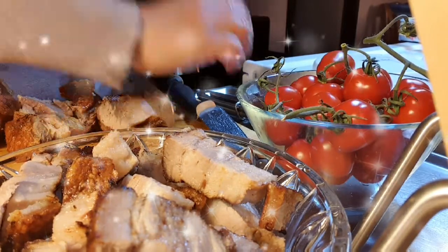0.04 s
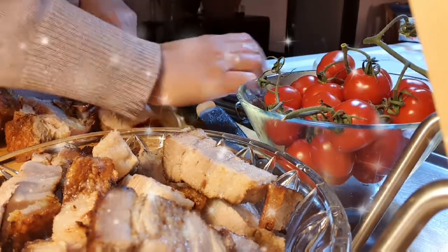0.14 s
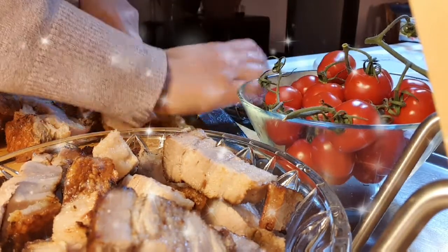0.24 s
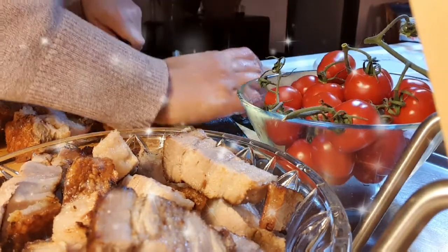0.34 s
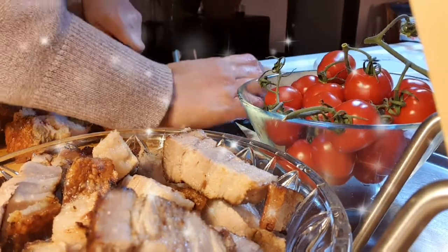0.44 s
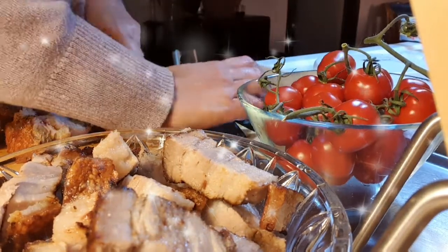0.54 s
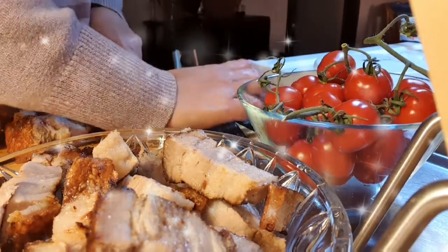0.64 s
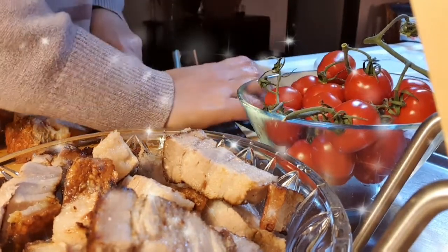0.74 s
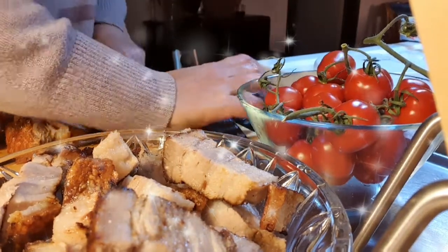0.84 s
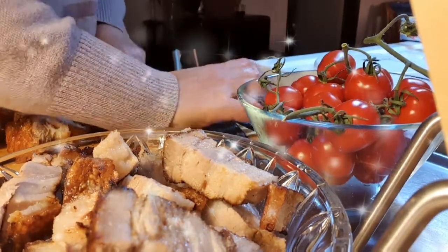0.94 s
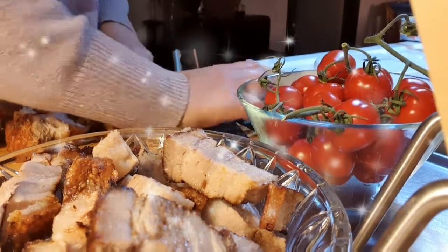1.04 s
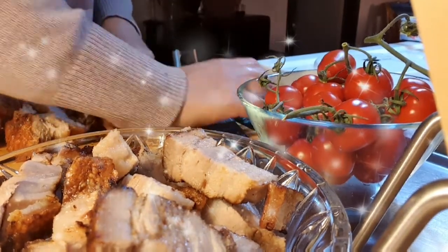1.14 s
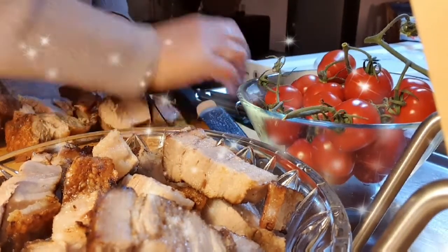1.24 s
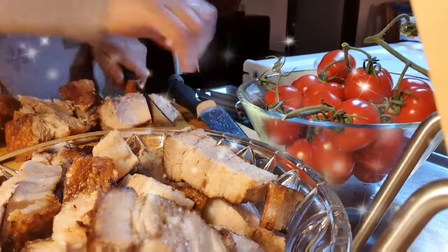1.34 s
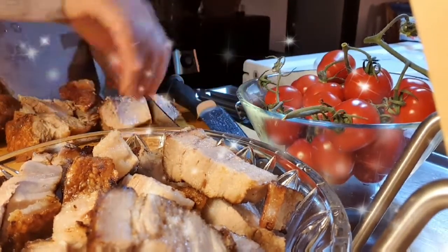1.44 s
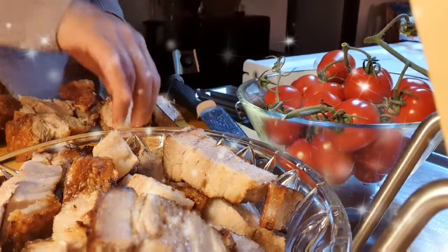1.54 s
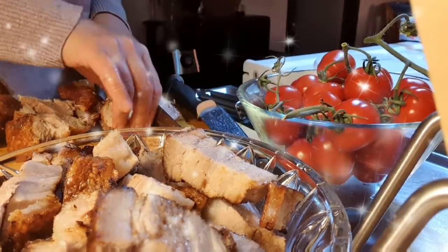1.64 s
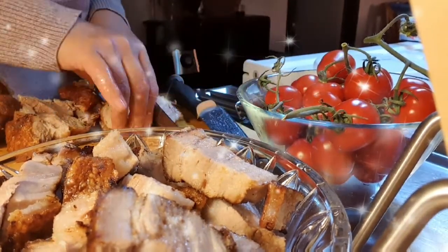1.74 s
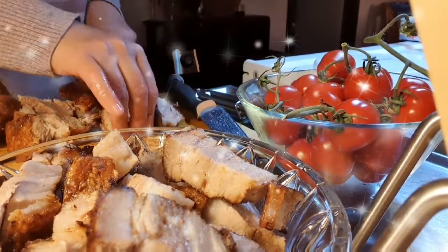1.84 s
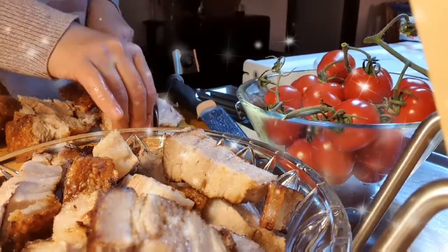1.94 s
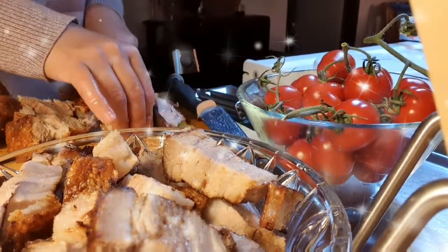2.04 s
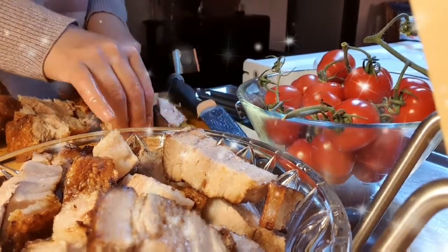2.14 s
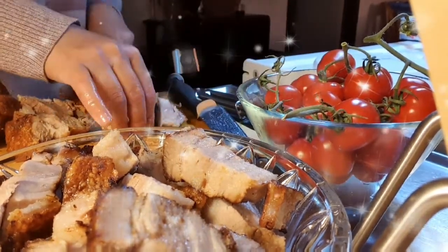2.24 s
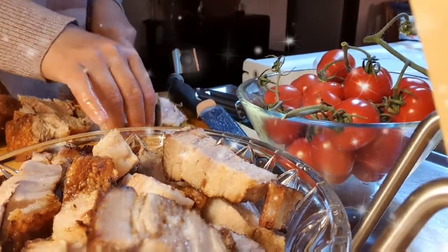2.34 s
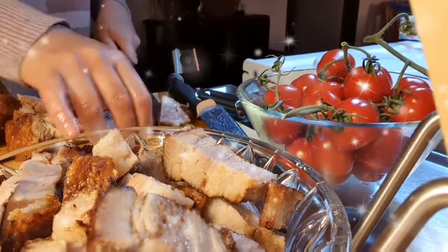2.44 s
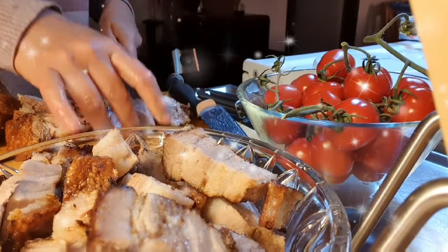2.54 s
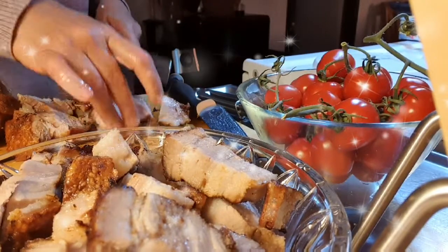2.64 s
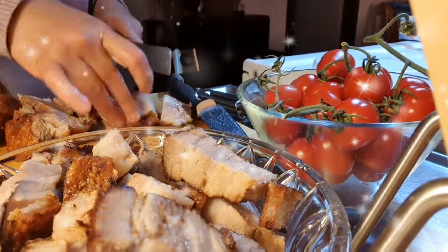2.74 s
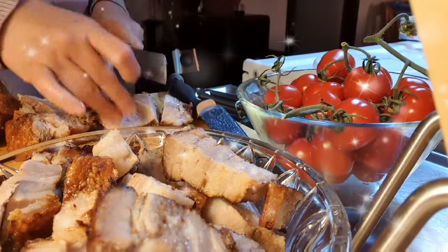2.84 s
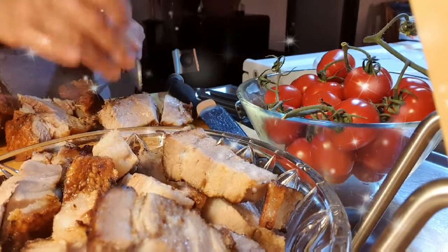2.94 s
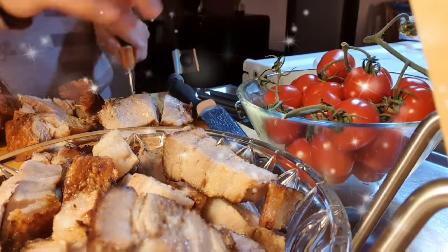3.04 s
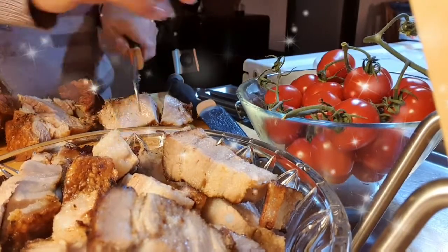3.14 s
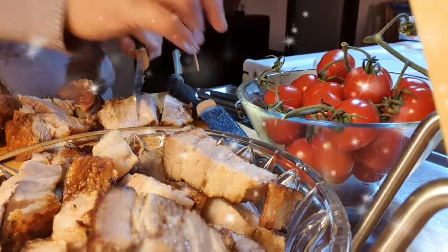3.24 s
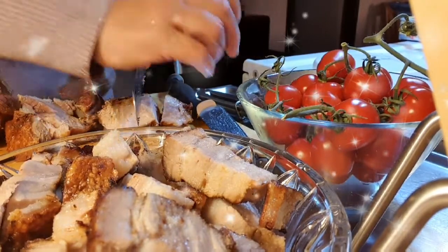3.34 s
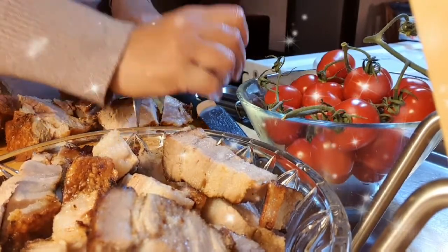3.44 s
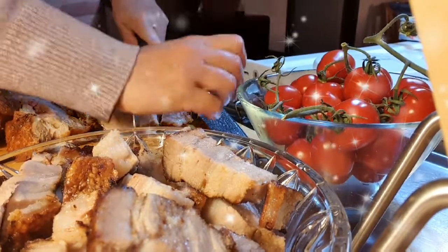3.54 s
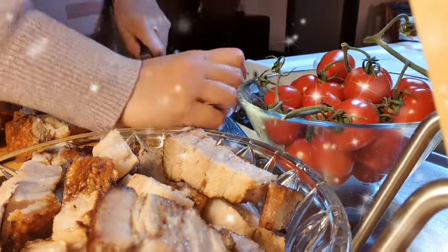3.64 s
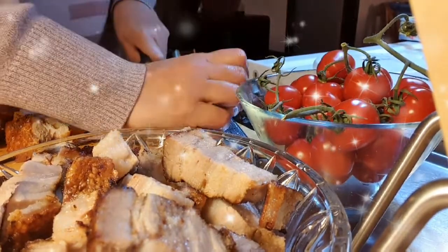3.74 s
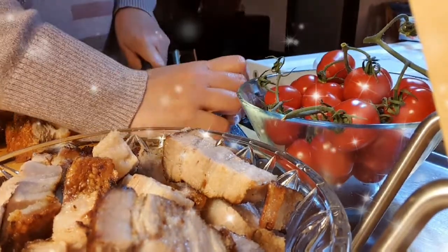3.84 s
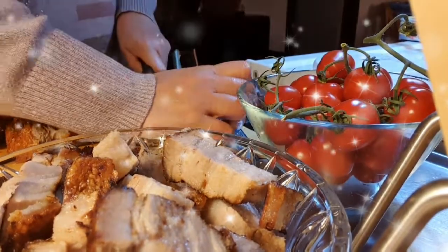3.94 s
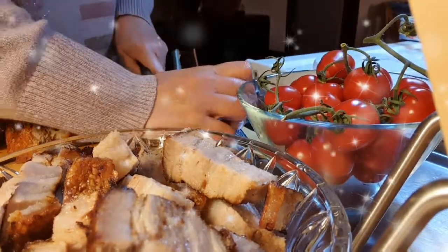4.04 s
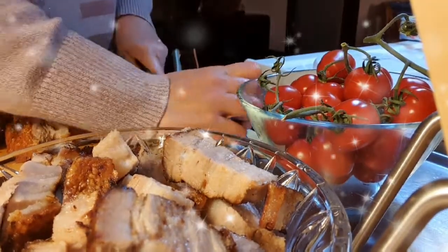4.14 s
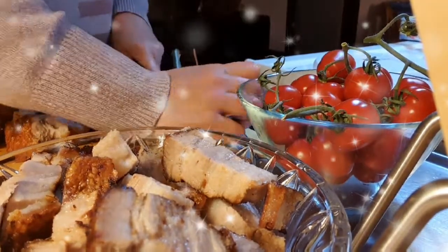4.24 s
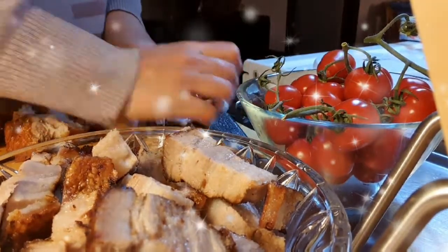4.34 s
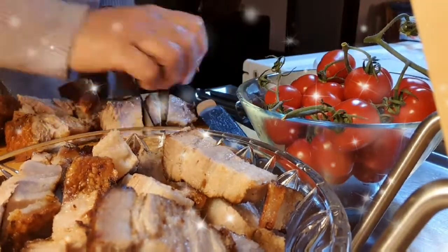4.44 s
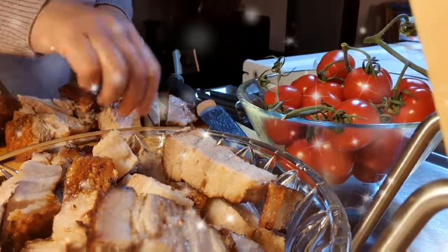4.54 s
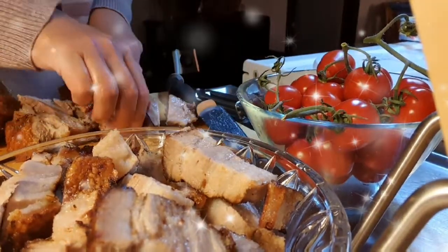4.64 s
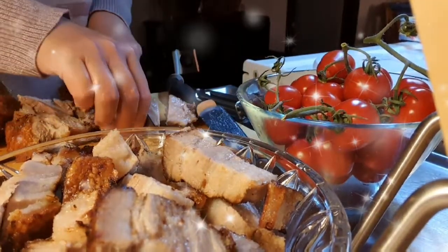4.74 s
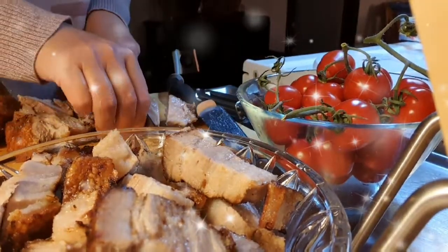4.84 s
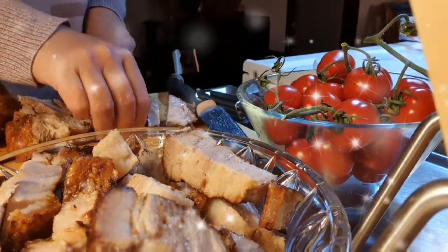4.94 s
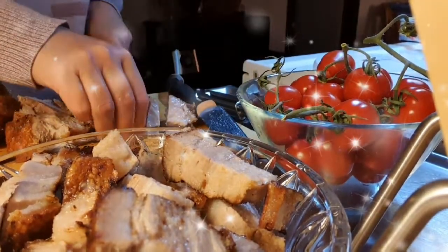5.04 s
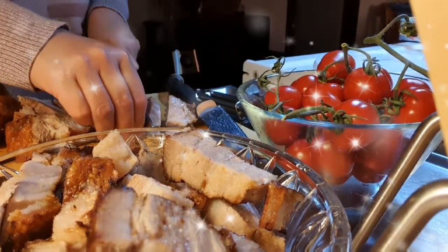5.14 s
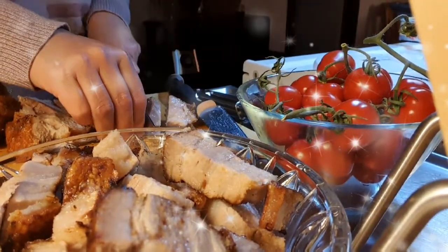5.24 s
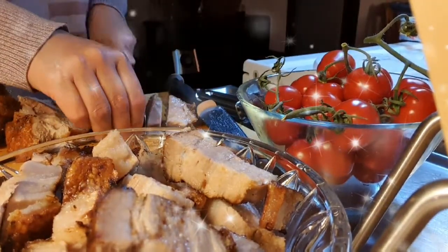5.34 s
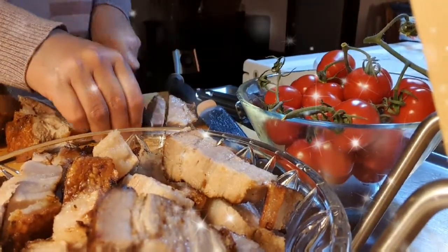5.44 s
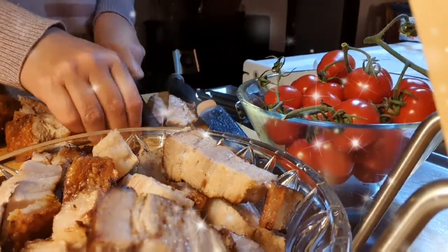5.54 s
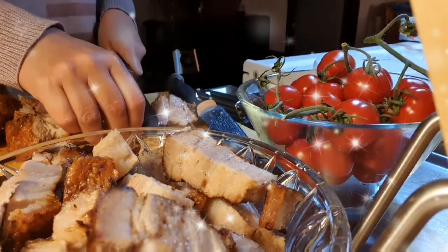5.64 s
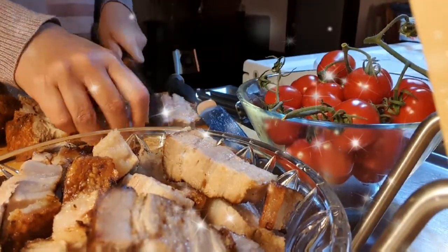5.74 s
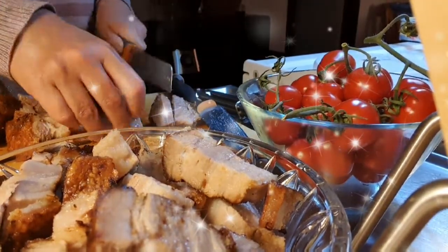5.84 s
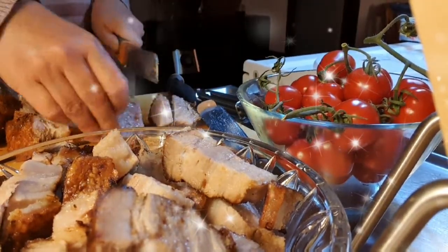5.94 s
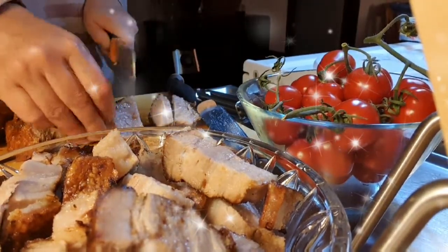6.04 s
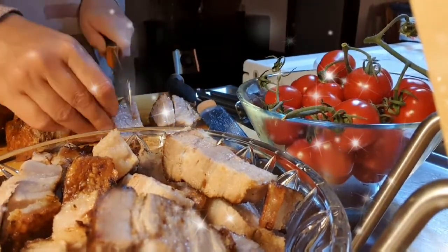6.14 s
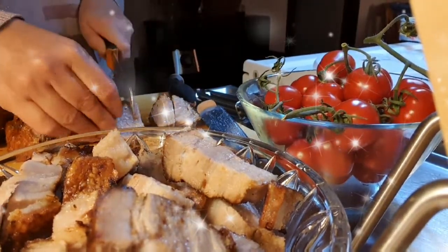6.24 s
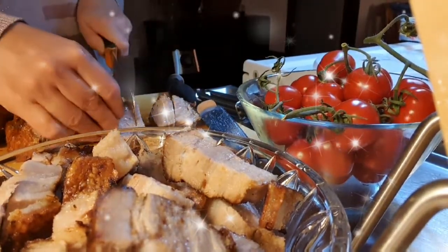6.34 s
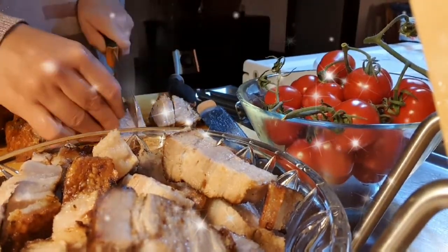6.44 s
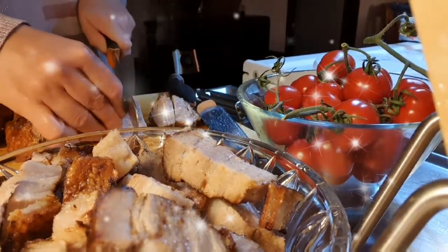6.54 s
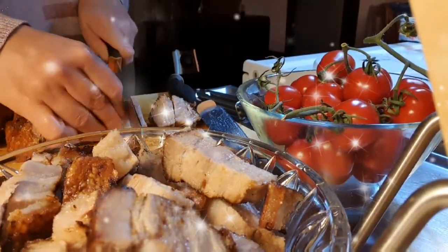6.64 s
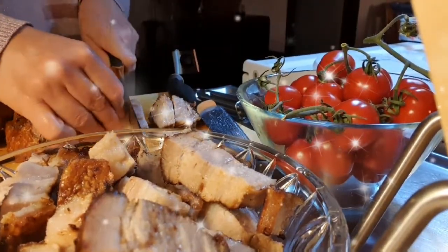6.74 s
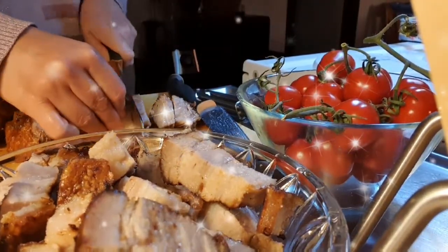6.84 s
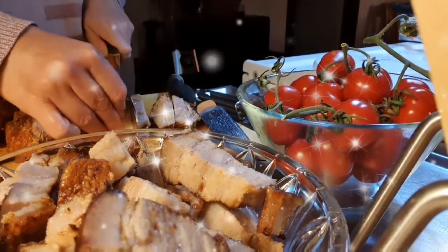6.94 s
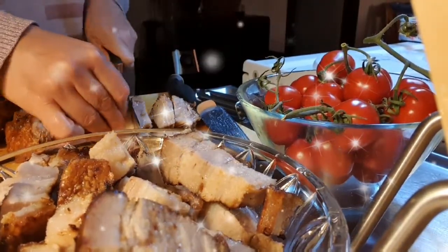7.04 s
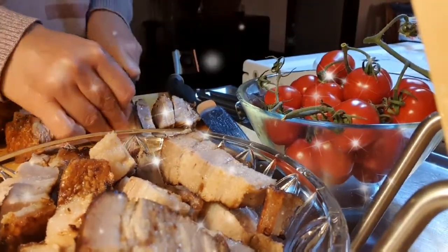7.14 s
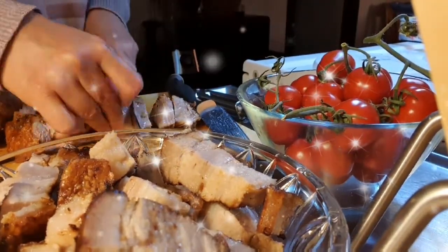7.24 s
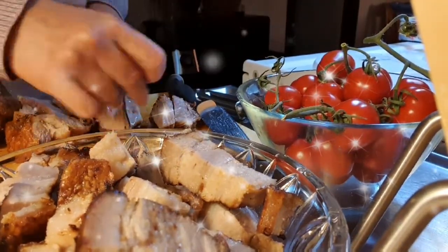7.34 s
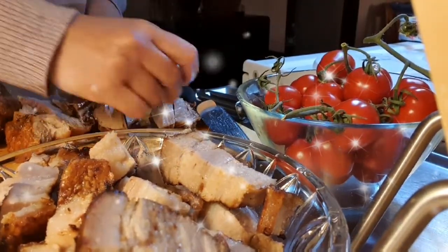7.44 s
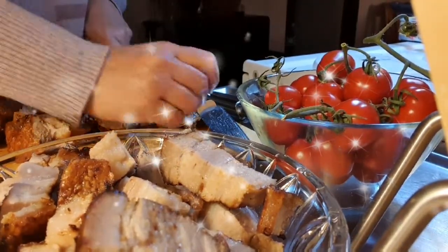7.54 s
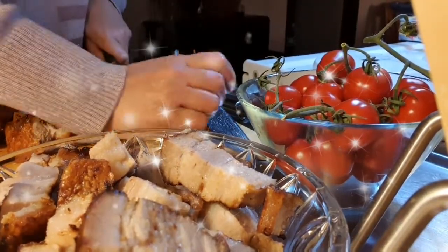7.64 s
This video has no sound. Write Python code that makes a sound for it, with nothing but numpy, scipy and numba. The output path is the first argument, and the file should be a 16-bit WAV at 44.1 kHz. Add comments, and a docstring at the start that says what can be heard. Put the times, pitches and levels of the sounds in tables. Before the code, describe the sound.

Dry, brittle snaps of pork crackling come in separate bunches as a knife cuts, each with dull low bumps of board and counter. Between cuts there is almost nothing but tiny rustles from the hands and faint room air. The strongest cracks fall near one, four and five and a half seconds; a single metallic blade clink comes late. Close microphone, short room tail.

```python
"""A knife saws and presses through crisp pork skin on a wooden board that stands on a kitchen counter.
The crust is random clicks in three crumb sizes, coloured and resonated, with single cracks as bursts.
Filtered clicks shake the damped modes of board and counter; the clink sums decaying, beating blade modes.
A small quiet kitchen adds a short tail of decaying noise to crust and clink, over faint steady air noise."""
import sys
import numpy as np
from scipy import signal
from scipy.fft import rfft, irfft
from scipy.io import wavfile
from scipy.ndimage import uniform_filter1d
from numba import njit

SR = 44100
rng = np.random.default_rng(int(sys.argv[2]) if len(sys.argv) > 2 else 0)


def waveform_to_disk(signal):
    """Save audio, clipped to [-1, 1], as 16-bit WAV at the path in sys.argv[1]."""
    frames = np.transpose(np.atleast_2d(signal))
    scaled = np.clip(frames, -1, 1) * 32767
    samples = np.round(scaled).astype(np.int16)
    wavfile.write(sys.argv[1], SR, samples)


N = 338247
T = np.arange(N) / SR  # time in seconds

# Strokes of the blade and shoves of the meat. Each row: full force from in seconds, climb in seconds,
# hold in seconds, relative crumb level in dB, coarse crumbs over it in dB, fine crumbs over it in dB,
# relative board shake in dB.
BLADE_STROKES = [(0.0, .03, .02, -95, 0, -2, -56), (0.224, .03, .03, -69, 3, -18, -41),
                 (0.31, .04, .04, -70, 0, -4, -45), (0.394, .03, .13, -67, 7, -5, -44),
                 (0.58, .03, .04, -63, -2, -11, -46), (0.655, .03, .04, -59, 4, -4, -44),
                 (0.735, .04, .0, -42, -6, -3, -44), (0.886, .025, .025, -35, -4, -3, -33),
                 (0.94, .04, .025, -43, 2, -9, -31), (1.135, .1, .01, -65, -7, -9, -58),
                 (1.237, .05, .03, -77, 6, -9, -52), (1.33, .05, .1, -82, 6, -12, -62),
                 (1.74, .03, .04, -86, -3, 1, -66), (1.875, .07, .07, -48, -3, -9, -34),
                 (1.96, .04, .02, -54, -7, -6, -28), (2.09, .05, .01, -49, 2, -4, -31),
                 (2.152, .1, .02, -37, 0, -4, -23), (2.27, .1, .03, -42, 0, -8, -28),
                 (2.35, .06, .02, -40, -1, -9, -35), (2.47, .1, .02, -57, 9, -14, -44),
                 (2.63, .03, .04, -66, 5, -20, -39), (2.8, .04, .03, -61, 7, -13, -49),
                 (2.958, .02, .005, -62, -15, -15, -52), (3.35, .15, .02, -110, 0, -10, -69),
                 (3.66, .06, .02, -84, -16, 8, -65), (3.735, .02, .02, -61, -1, -2, -55),
                 (3.86, .12, .02, -65, 0, -5, -53), (3.96, .12, .05, -47, 0, -4, -44),
                 (4.05, .1, .055, -45, 0, -8, -35), (4.2, .06, .02, -70, -1, 0, -44),
                 (4.398, .03, .01, -79, 4, -9, -60), (4.52, .06, .03, -85, -1, 2, -73),
                 (4.704, .025, .07, -70, -4, -9, -55), (4.86, .05, .02, -88, 3, 6, -72),
                 (4.92, .03, .02, -64, 2, -4, -54), (5.0, .07, .075, -42, 2, -7, -23),
                 (5.11, .04, .02, -66, -3, 0, -30), (5.195, .04, .03, -48, 1, -8, -27),
                 (5.26, .05, .015, -44, 4, -5, -23), (5.411, .1, .005, -37, 3, -4, -22),
                 (5.53, .1, .03, -55, 5, -15, -43), (5.595, .05, .01, -51, 3, -11, -27),
                 (5.685, .05, .005, -39, -5, -11, -39), (5.98, .02, .0, -80, 12, -22, -68),
                 (6.11, .1, .02, -110, 0, -10, -63), (6.33, .04, .03, -90, 0, -6, -80),
                 (6.5, .04, .04, -92, 2, -6, -78), (6.66, .04, .04, -92, 0, -2, -74),
                 (6.74, .02, .04, -77, -16, -6, -82), (6.8, .02, .01, -85, -6, -3, -37),
                 (6.98, .08, .12, -92, -10, 6, -70), (7.175, .05, .04, -53, -3, -9, -44),
                 (7.383, .06, .02, -59, 7, -22, -44), (7.45, .08, .03, -63, -3, -9, -48)]
# Hands resting and shifting between strokes. Each row: time in seconds, relative board shake in dB.
HAND_SHIFTS = [(0.0, -66), (0.17, -82), (0.3, -58), (1.1, -59), (1.3, -57), (1.75, -70), (2.5, -60),
               (2.97, -58), (3.04, -81), (3.57, -85), (3.75, -64), (4.25, -68), (4.88, -78), (5.75, -50),
               (5.95, -68), (6.24, -85), (6.4, -76), (6.75, -80), (6.87, -54), (7.07, -60), (7.14, -71),
               (7.52, -52), (7.67, -90)]
# Crumb level over the hands' board shake in dB: coarse, middle, fine.
HANDS_CRUMBS_OVER_DB = [-26, -33, -34]
# Single snaps and small taps. Each row: start in seconds, relative peak in dB, coarse part over it in dB,
# fine part over it in dB, relative knock on the board in dB.
SNAPS = [(0.2024, -64, 6, -8, -60), (0.2197, -50, 3.5, -12, -62), (0.2833, -45.5, 0.5, -9, -52),
         (0.3022, -49.5, 7.5, -20, -30.5), (0.375, -47, 5, -12, -47), (0.4088, -46, -2, -11, -46),
         (0.4418, -56.5, 9, -17, -51), (0.4807, -42, 0, -23, -49), (0.5723, -40, -11, -4, -59),
         (0.6412, -22.5, -7, -6, -35), (0.7154, -31, -10.5, -7, -44), (0.7218, -30, -3.5, -3.5, -43),
         (0.74, -27.5, -8.5, -10, -60), (0.8807, -23, -2.5, -9.5, -31), (0.8968, -16.5, -7.5, -14, -33),
         (0.9289, -23, -8, -14.5, -18.5), (0.9722, -14.5, -8, -7.5, -34), (1.0824, -55, -10, 6, -62),
         (1.131, -51.5, -3, -13, -61), (1.1444, -55, 0, 3, -52), (1.2214, -59, 11.5, -17, -52),
         (1.3022, -69, -0.5, -32, -65), (1.3808, -60, 6, -21, -75), (1.4545, -65, 3, -20.5, -78),
         (1.5212, -72, 9, -18, -69), (1.8554, -46, -8, -3, -38), (1.8838, -40, -14.5, -7.5, -37),
         (1.9905, -38, 5.5, 3, -40.5), (2.0315, -24.5, -5, -5, -62), (2.0646, -25.5, -12.5, -17, -47),
         (2.0842, -30, -14.5, -7, -44), (2.154, -27, 0, -3.5, -27.5), (2.2142, -40, 6, -7, -35),
         (2.4413, -45, -3, 1, -49), (2.6127, -51.5, 14.5, -29, -51), (2.6312, -56, 2, -30, -61),
         (2.7754, -51, 2, -18, -58), (2.9482, -42.5, -12, -21, -61), (3.6174, -68, -12, -4, -75),
         (3.6564, -62, -18, -5, -73), (3.7252, -36, -9, -5.5, -48), (3.7886, -45.5, -3.5, -10.5, -50.5),
         (3.83, -45.5, -6, -8, -50.5), (3.879, -44, -7.5, -7.5, -50), (3.9078, -41, 0, -15, -47),
         (3.9647, -26.5, 3, -2, -39.5), (3.9994, -16, -4.5, -11, -39.5), (4.0369, -11, -4.5, -7, -27.5),
         (4.0901, -11.5, -10.5, -6.5, -31.5), (4.0956, -21.5, -13, -8, -36), (4.2408, -31.5, -14, -7, -50),
         (4.2796, -51, -11, -13, -62), (4.3824, -63, 2, -12, -65), (4.6956, -47.5, -16, -2.5, -71),
         (4.7383, -34.5, -6, -11.5, -60), (4.9093, -36, -10.5, 1, -60), (4.9671, -37, -2.5, -10, -38.5),
         (5.1706, -42, -4, -4.5, -51), (5.3522, -35.5, 1.5, 0, -53), (5.4096, -12, -1.5, -6.5, -23),
         (5.5856, -36, -3.5, -28, -37), (5.6645, -30, -7, -14, -46), (5.687, -32, -10, -9, -48),
         (5.957, -65, 7.5, -9, -75), (5.9848, -64, 4, -20, -69), (7.1918, -35, -12, -6, -50),
         (7.3125, -53.5, -4, -16, -66), (7.3422, -42, -7, -12, -64), (7.3778, -43, -2, -15, -45),
         (7.459, -50, 6, 1, -61)]
# Decay times of a snap by 60 dB in seconds: coarse, middle, fine.
SNAP_DECAYS_S = [0.052, 0.035, 0.043]
# Colour of coarse, middle and fine crumbs, a curve each. Each row: frequency in Hz, relative level in dB.
CRUMB_COLOURS = [
    [(400, -21.5), (700, -3), (1200, -2), (1700, -2.5), (3200, -26)],
    [(1100, -24), (2100, -1.5), (3400, -4), (4800, -5.5), (7000, -26)],
    [(4000, -26), (5800, 1.5), (7600, -4.5), (8800, -0.5), (14300, -7.5), (16000, -12)],
]
# Pitches at which coarse, middle and fine crumbs ring. Each row: lowest in Hz, highest in Hz.
CRUMB_PITCHES = [(700, 1900), (1900, 5650), (5300, 13000)]
# Rings under the crust. Each row: frequency in Hz, width in Hz, relative spectral peak in dB.
CRUST_MODES = [(875, 130, -4), (1307, 13, 10.5), (1676, 46, 7.5), (2140, 55, 1), (5180, 170, -13)]
# Modes of the wooden board. Each row: frequency in Hz, width in Hz, relative spectral peak in dB.
BOARD_MODES = [(211, 56, -5.5), (256.4, 13, 3), (287.1, 28, 6), (347, 34, -6.5), (468.5, 31, -7.5),
               (510, 13, -15.5)]
# Modes of the counter. Each row: frequency in Hz, width in Hz, relative spectral peak in dB.
COUNTER_MODES = [(60, 25, -8), (95.5, 19, -1.5), (113.3, 22, 1)]
# Thumps of the board against the counter. Each row: time in seconds, relative level in dB.
BOARD_THUMPS = [(0.02, -50), (0.23, -33), (0.44, -41), (0.575, -38), (0.73, -31), (0.93, -17), (1.27, -45),
                (1.92, -28), (1.98, -32), (2.09, -29), (2.18, -23), (2.64, -42), (2.75, -48), (3.3, -72),
                (3.66, -51), (3.82, -50), (4.01, -26), (4.07, -37), (4.2, -46), (4.4, -53), (4.99, -25),
                (5.08, -31), (5.18, -30), (5.34, -31), (5.44, -27), (5.6, -29), (5.7, -35), (6.11, -53),
                (6.33, -62), (6.5, -66), (6.72, -63), (6.8, -43), (7.02, -49), (7.2, -43), (7.5, -56)]
# Colour of the kitchen air. Each row: frequency in Hz, relative level in dB.
AIR_COLOUR = [(15, -27.5), (25, 2), (105, 4), (229, -9), (285, -3.5), (607, -26.5), (1610, -27),
              (7310, -40.5), (8590, -41), (16000, -44.5)]
# Modes of the blade. Each row: frequency in Hz, relative level in dB, decay by 60 dB in seconds.
BLADE_MODES = [(1233, -13, .15), (1416, -12, .15), (2095, -8, .12), (2240, -9, .1), (2750, -6, .12),
               (2942, -8, .12), (3275, -7, .1), (4245, -2, .12), (4404, -9, .1), (5757, 0, .13),
               (6910, -5, .08), (7617, -15, .1), (8349, -12, .1), (8990, -4, .08), (9225, -7, .09),
               (9964, -13, .09), (11270, -6, .08), (11440, -9, .08), (13460, -17, .1), (15440, -30, .07)]

CLIMB_DB = 30  # rise of a swell within its climb time
CRUST_FALL_DB_S, BOARD_FALL_DB_S, COUNTER_FALL_DB_S = 480, 320, 400  # dB per second
LINGER_DB, LINGER_FALL_DB_S = -27, 150  # the meat settles after each stroke
GRAIN_FLOOR_DB = -102  # a constant, very faint hiss of grains beneath everything
STROKE_COUNTER_DB, HANDS_COUNTER_DB = -12, 5  # counter shake over board shake
THUMP_CLIMB_S, THUMP_HOLD_S = .04, .005
AIR_DB = -74  # rms
ROOM_T60_S, ROOM_TREBLE_T60_S, ROOM_DB = .38, .24, -14
CLINK_S, CLINK_DB = 6.7895, -24
TOP_HZ = 15800


def undb(db):
    """Amplitude ratio, by the definition of the decibel."""
    return 10 ** (np.asarray(db) / 20)


def level(x, db):
    """Linear scaling to a given rms level."""
    return x * undb(db) / np.sqrt(np.mean(x ** 2))


def unit(h):
    """Normalisation of a response to unit energy."""
    return h / np.sqrt(np.sum(h ** 2))


def through(x, h):
    """A linear system: its output is input convolved with impulse response."""
    return signal.fftconvolve(x, h)[:N]


def curves(table):
    """Linear interpolation of a table's columns, one value a sample."""
    s, *columns = np.transpose(table)
    return [np.interp(T, s, c) for c in columns]


def response(points, size=2048):
    """Minimum phase: folding the cepstrum makes a colour causal; unit energy."""
    hz, db = np.transpose(points)
    grid = np.maximum(np.arange(size // 2 + 1), 1) * SR / size
    colour_db = np.interp(np.log(grid), np.log(hz), db, left=-70, right=-70)
    ceps = irfft(np.log(undb(colour_db)))
    ceps[1:size // 2] *= 2
    ceps[size // 2 + 1:] = 0
    return unit(irfft(np.exp(rfft(ceps))))


def ring(modes):
    """Modal superposition: damped sines, each decaying as its width demands."""
    t = T[:SR // 4]
    out = 0
    for hz, width_hz, db in modes:
        decay = np.exp(-np.pi * width_hz * t)
        # proportional to width, so that the dB set the spectral peak
        out = out + undb(db) * 2 * np.pi * width_hz / SR * decay * np.sin(2 * np.pi * hz * t)
    return out


def grains(per_s, spread_db):
    """Shot noise: random clicks of either sign, sizes spread exponentially in dB; rms 1."""
    hit = rng.random(N) < per_s / SR
    size = undb(spread_db * rng.exponential(size=N))
    return level(hit * rng.standard_normal(N) * size, 0)


def bursts(times, db, t60):
    """Exponential decay: envelope of sudden bursts that die away."""
    out = np.zeros(N)
    out[(np.asarray(times) * SR).astype(int)] = undb(db)
    return through(out, 1000. ** (-T[:SR // 4] / max(t60, .001)))


def swells(s, climb, hold, top_db, fall_db_s):
    """Exponential growth and decay: gain of events that climb, hold and fall."""
    t = T[::64, None]
    climbing = CLIMB_DB * (s - t) / np.maximum(climb, .005)
    falling = fall_db_s * (t - s - hold)
    under_db = np.maximum(np.maximum(climbing, falling), 0)
    return np.interp(T, t.ravel(), undb(top_db - under_db).sum(axis=1))


def force(stroke_db, hands_db, fall_db_s):
    """Superposed forces: the strokes, the settling after each, and the hands beneath them."""
    s, climb, hold, *_ = np.transpose(BLADE_STROKES)
    strokes = swells(s, climb, hold, stroke_db, fall_db_s)
    linger = swells(s, climb, hold, stroke_db + LINGER_DB, LINGER_FALL_DB_S)
    return strokes + linger + undb(curves(HAND_SHIFTS)[0] + hands_db)


@njit
def resonate(x, hz, sharp):
    """Resonance: a state-variable band-pass with a moving centre, gain 1 there."""
    y, band, low = np.empty(len(x)), 0., 0.
    for i in range(len(x)):
        g = np.tan(np.pi * hz[i] / SR)
        v = (band + g * (x[i] - low)) / (1 + g * (g + 1 / sharp))
        band, low, y[i] = 2 * v - band, low + 2 * g * v, v / sharp
    return y


def crust():
    """Brittle fracture: grains of three sizes, steady under the blade and bunched in snaps."""
    s, peak_db, coarse_db, fine_db, _ = np.transpose(SNAPS)
    *_, crumbs_db, coarser_db, finer_db, _ = np.transpose(BLADE_STROKES)
    # crumbs break in clumps a few ms long, common to all sizes
    clump = undb(2.0 * level(uniform_filter1d(rng.standard_normal(N), SR // 120), 0))
    snap_grains = grains(14000, spread_db=2.0)
    sizes = zip((coarser_db, 0, finer_db), HANDS_CRUMBS_OVER_DB, (coarse_db, 0, fine_db),
                SNAP_DECAYS_S, CRUMB_COLOURS, CRUMB_PITCHES)
    out = 0
    for over_db, hands_db, snap_db, t60, colour, (lo_hz, hi_hz) in sizes:
        gain = force(crumbs_db + over_db, hands_db, CRUST_FALL_DB_S) + undb(GRAIN_FLOOR_DB)
        crumbs = gain * clump * grains(8000, spread_db=1.4)
        snaps = bursts(s, peak_db + snap_db - 7.5, t60) * snap_grains
        broken = through(crumbs + snaps, response(colour))
        # a new piece, with its own pitch, rings about every 6 ms
        piece = np.cumsum(rng.random(N) < 1 / (.006 * SR))
        pitch_hz = lo_hz * (hi_hz / lo_hz) ** rng.random(N)[piece]
        ringing = resonate(broken + 1e-18, pitch_hz, 5.0)
        out = out + undb(-1.5) * broken + undb(1.5) * ringing
    return out + through(out, ring(CRUST_MODES)) * undb(-6)


def wood():
    """Forced modal vibration: pushes shake board and counter, snaps knock the board."""
    board_db = np.transpose(BLADE_STROKES)[-1]
    board = force(board_db, 0, BOARD_FALL_DB_S)
    shake = through(board * grains(1500, spread_db=1.5), unit(ring(BOARD_MODES)))

    thump_s, thump_db = np.transpose(BOARD_THUMPS)
    thumps = swells(thump_s, THUMP_CLIMB_S, THUMP_HOLD_S, thump_db, COUNTER_FALL_DB_S)
    counter = thumps + force(board_db + STROKE_COUNTER_DB, HANDS_COUNTER_DB, BOARD_FALL_DB_S)
    sway = through(counter * grains(1000, spread_db=2.0), unit(ring(COUNTER_MODES)))

    # a short hard contact rings the two upper modes
    s, *_, knock_db = np.transpose(SNAPS)
    upper = ring(BOARD_MODES[-2:])
    knocks = through(bursts(s, knock_db - 20.5, 0.0032), upper / upper.max())
    # small bodies radiate little deep bass
    high_pass = signal.butter(4, 52, "high", fs=SR, output="sos")
    return signal.sosfilt(high_pass, shake + sway + knocks)


def kitchen_air():
    """Stationary noise: white noise filtered to the colour of the quiet kitchen."""
    return level(through(rng.standard_normal(N), response(AIR_COLOUR, size=8192)), AIR_DB)


def room(x):
    """Diffuse reverberation: a dense noise tail after a 4 ms gap; the treble dies first."""
    t = T[:SR // 2]
    low = uniform_filter1d(rng.standard_normal(len(t)), size=9) * 1000. ** (-t / ROOM_T60_S)
    treble = rng.standard_normal(len(t)) * 1000. ** (-t / ROOM_TREBLE_T60_S)
    tail = (low + treble) * (t > .004)
    return through(x, undb(ROOM_DB) * unit(tail))


def clink():
    """Beating modes: a hard contact rings the blade in close pairs, with a dull rattle and a board thud."""
    t = np.maximum(T - CLINK_S, 0)
    tones = 0
    for hz, db, t60 in BLADE_MODES:
        pair = np.sin(2 * np.pi * hz * t) + .8 * np.sin(2 * np.pi * 1.003 * hz * t)
        tones = tones + undb(db) * 1000. ** (-t / t60) * pair
    # the blade chatters against what it struck, which roughens its ring
    chatter = 1 + .45 * level(uniform_filter1d(rng.standard_normal(N), SR // 250), 0)
    tones = tones * chatter * np.minimum(t / .0012, 1)  # 1.2 ms onset
    # rattle colour, each point: frequency in Hz, relative level in dB
    colour = response([(300, -16), (800, -5), (2800, 0), (3800, -6), (4800, -19), (9000, -18),
                       (11500, -26), (14000, -50), (16000, -55)])
    fade = bursts([CLINK_S], [5], 0.041) + bursts([CLINK_S], [-9], 0.15)
    rattle = fade * through(rng.standard_normal(N), colour)
    thud = through(bursts([CLINK_S], [-6], 0.0036), unit(ring(BOARD_MODES)))
    return undb(CLINK_DB) * (tones + rattle + thud)


def scene():
    """Superposition: crust and clink excite the room; wood and air are added dry."""
    near = crust() + clink()
    return (near + room(near) + wood() + kitchen_air())[None]


def record(dry):
    """Band limitation: a steep elliptic low-pass cuts the top."""
    return signal.sosfilt(signal.ellip(10, .2, 70, TOP_HZ, fs=SR, output="sos"), dry)


dry = scene()
out = record(dry)
waveform_to_disk(out)
```